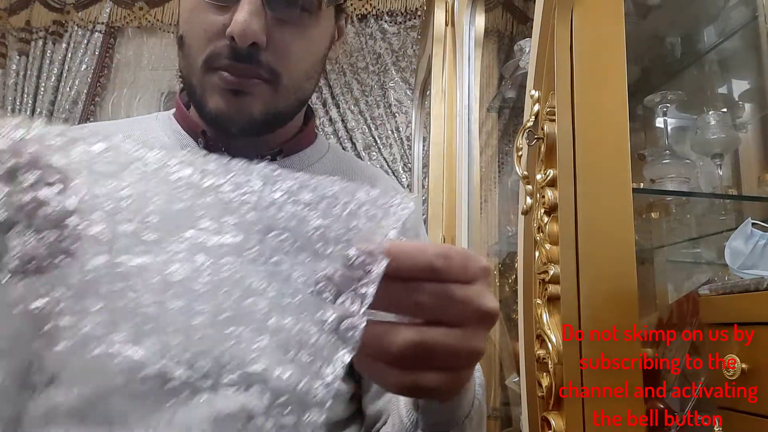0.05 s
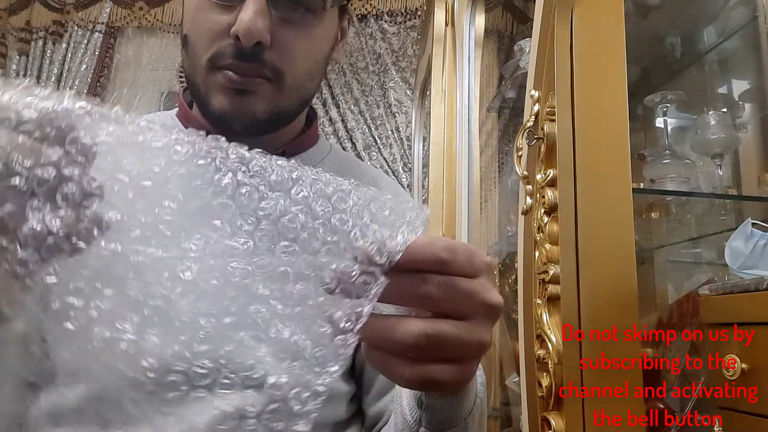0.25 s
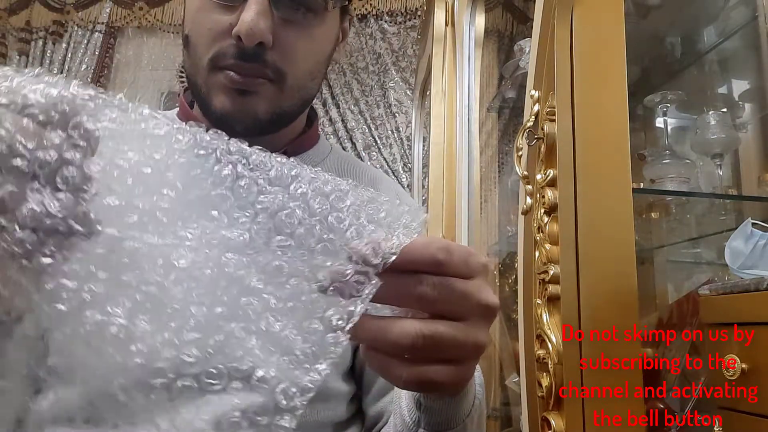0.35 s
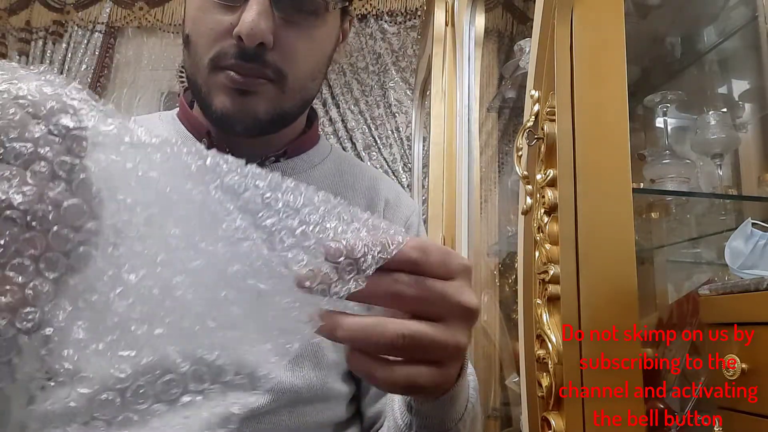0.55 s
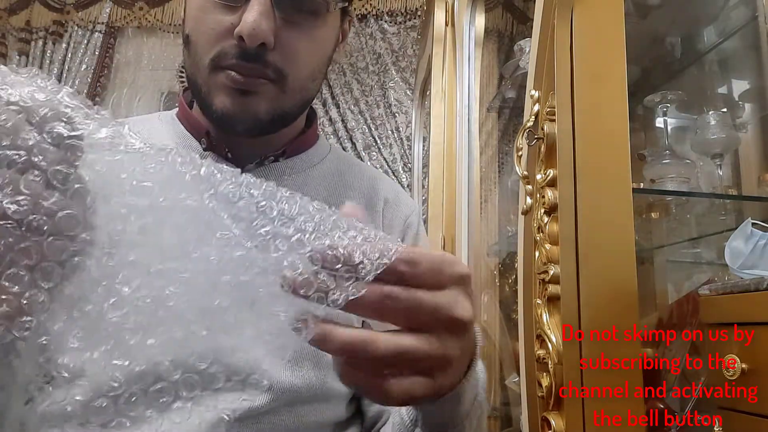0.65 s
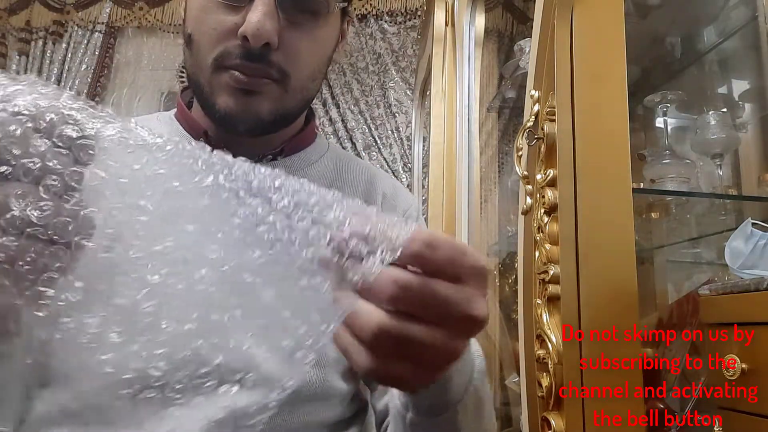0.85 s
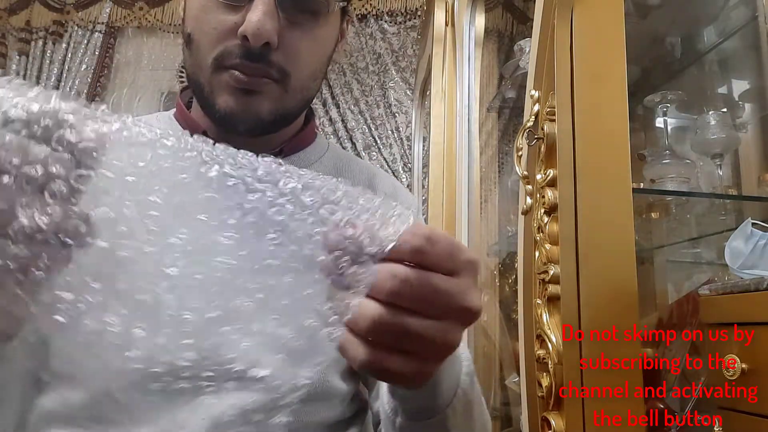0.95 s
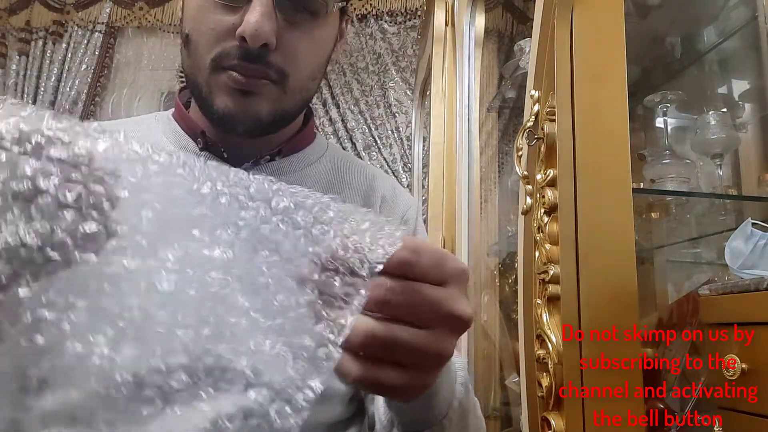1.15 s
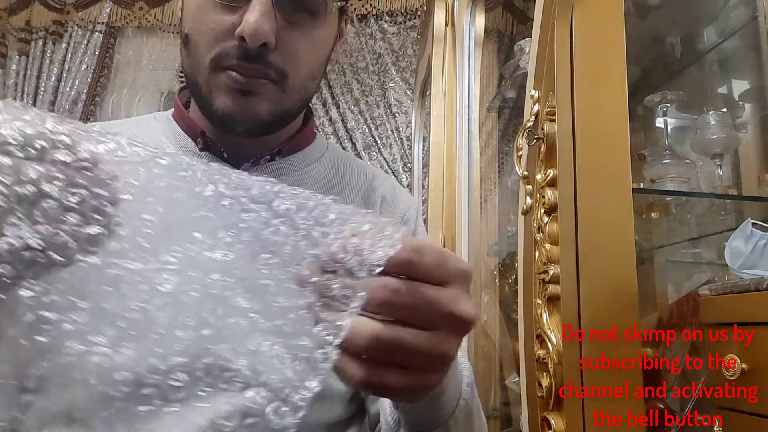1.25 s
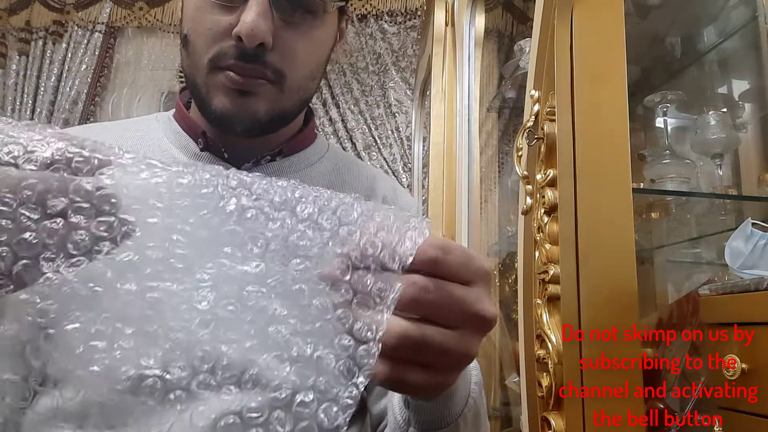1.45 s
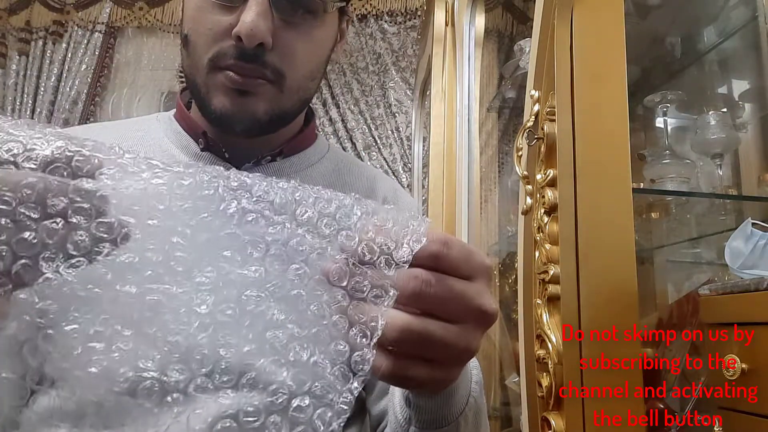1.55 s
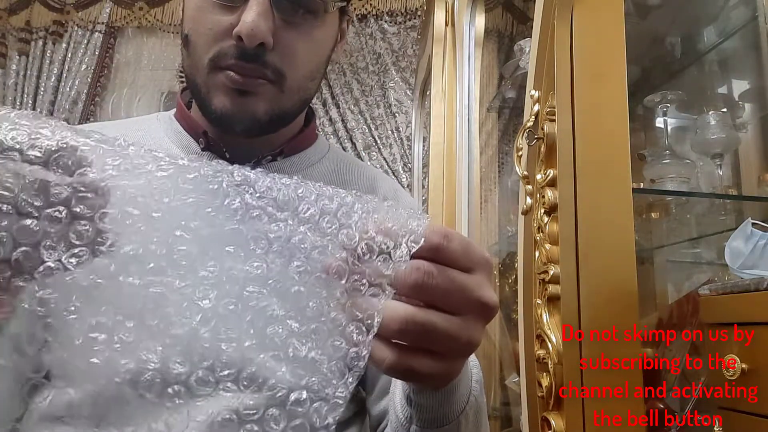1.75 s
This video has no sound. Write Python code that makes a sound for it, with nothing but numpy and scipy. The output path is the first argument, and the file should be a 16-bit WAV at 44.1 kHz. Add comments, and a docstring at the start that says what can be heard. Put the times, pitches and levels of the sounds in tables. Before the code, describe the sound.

One sharp bubble wrap pop, with a low rub of hands and faint plastic crinkles.

```python
"""In a small quiet room, hands shift a sheet of bubble wrap and burst it once.
The film crackles faintly as its creases buckle. The flexing sheet rumbles in a few low resonances
and hums briefly while it is squeezed. The pop is a quick cluster of bright cracks from the tearing
film with a puff of escaping air, followed by early echoes and a short reverberant tail."""
import sys
import numpy as np
from scipy import signal
from scipy.fft import rfft, irfft
from scipy.io import wavfile
from scipy.ndimage import uniform_filter1d

SR = 44100
rng = np.random.default_rng(int(sys.argv[2]) if len(sys.argv) > 2 else 0)


def unload_audio(sound):
    """Save the sound as a 16-bit wav file, at the path given as the first command line argument."""
    columns = np.transpose(np.atleast_2d(sound))
    # keep every value between -1 and 1, then stretch to whole-number steps
    steps = np.round(np.clip(columns, -1, 1) * 32767)
    wavfile.write(sys.argv[1], SR, steps.astype(np.int16))


N = 79380
T = np.arange(N) / SR

# reverberation time of the room (frequency [Hz], T60 [s])
ROOM_T60 = [(300, .25), (800, .13), (2000, .13), (3500, .1), (8000, .08), (15000, .064)]
# spectrum of the crinkles and of the pop's late tail (frequency [Hz], level [dB])
CRINKLE_SPECTRUM = [(500, -14), (1200, -3.5), (1900, 2), (2600, -1), (3600, -6), (8000, -9.5),
                    (12000, -17.5), (16000, -25.5)]


def amp(db):
    """Amplitude ratio of a level in decibels."""
    return 10 ** (np.asarray(db) / 20)


def at_frequency(points, hz):
    """Interpolation on a logarithmic frequency axis."""
    frequencies, values = np.transpose(points)
    return np.interp(np.log(hz + 1), np.log(frequencies + 1), values)


def add(mix, start_s, sound):
    """Superposition: a sound joins the mix at its onset."""
    part = mix[round(start_s * SR):][:len(sound)]
    part += sound[:len(part)]


def coloured(x, spectrum, size=4096):
    """Minimum-phase filtering: a causal response of unit energy imposes the spectrum."""
    log_gain = np.log(amp(at_frequency(spectrum, abs(np.fft.fftfreq(size, 1 / SR)))))
    taps = np.fft.ifft(np.exp(np.conj(signal.hilbert(log_gain)))).real[:size // 2]
    return signal.fftconvolve(x, taps / np.linalg.norm(taps))[:len(x)]


def snap(decay_s, size=512):
    """Broadband transient: a decaying burst of tiny tears, evened to a flat spectrum."""
    burst = rng.standard_normal(size) * np.exp(-T[:size] / decay_s)
    spectrum = rfft(burst, 2 * size)
    return irfft(spectrum / (abs(spectrum) + 1e-12))[:size] * np.sqrt(decay_s * SR / 2)


def reverberation(x, t60s, delay_s=.006):
    """Diffuse field: dense reflections build up, then decay exponentially in each band."""
    hz, t, bands = signal.stft(rng.standard_normal(SR // 2), SR, nperseg=128)
    tail = signal.istft(bands * amp(-60 * t / at_frequency(t60s, hz)[:, None]), SR)[1]
    tail *= np.clip(T[:len(tail)] / delay_s - .5, 0, 1)
    return signal.fftconvolve(x, tail / np.linalg.norm(tail))[:N]


def room_hush():
    """Ambient noise: a steady random floor, strongest at low frequencies."""
    # spectrum of the quiet room (frequency [Hz], level [dB])
    spectrum = [(100, 0), (720, 2.5), (1100, -8.5), (2400, -10.5), (7300, -14), (16000, -22.5)]
    return amp(-93.5) * coloured(rng.standard_normal(N), spectrum)


def crinkles(ticks_per_s=1600, snap_s=.00026, decay_cycles=2.7):
    """Buckling: creases snap and ring at their own pitch; each touch swells a flurry of tiny ticks."""
    # touches on the film (centre time [s], duration [s], level [dB])
    touches = [(0.612, 0.057, -99), (.86, 0.029, -93.5), (0.973, 0.1, -97.5), (1.177, 0.061, -98),
               (1.388, 0.061, -101)]
    # buckling creases (time [s], level [dB], frequency [Hz])
    creases = [(.158, -78, 1867), (.630, -80, 2030), (0.852, -77.5, 2390), (0.943, -78.5, 2400),
               (.968, -84, 2210), (1.029, -80.5, 8850), (1.097, -76.5, 2100), (1.139, -79, 1950),
               (1.176, -73, 2100), (1.190, -75.5, 10800), (1.396, -82.5, 1750), (1.575, -88, 7320),
               (1.733, -87, 7000)]
    swells = sum(amp(db) * np.exp(-(2 * (T - s) / length) ** 2) for s, length, db in touches)
    ticks = (rng.random(N) < ticks_per_s / SR) * rng.standard_normal(N)
    clicks = (amp(-106) + swells) * ticks / np.sqrt(np.mean(ticks ** 2) + 1e-30)
    rings, t = np.zeros(N), T[:SR // 20]
    for start, db, hz in creases:
        add(clicks, start, amp(db) * snap(snap_s))
        ring_s = decay_cycles / hz
        ring = np.exp(-t / ring_s) * np.sin(2 * np.pi * hz * t)
        add(rings, start, amp(db - .5) * np.sqrt(2 * snap_s / ring_s) * ring)
    direct = coloured(clicks, CRINKLE_SPECTRUM) + rings
    return direct + amp(-9) * reverberation(direct, ROOM_T60)


def noise_band(levels, spectrum, modes=(), window=2200):
    """Random excitation: noise shaped by a band and its resonances, steadied, then given an envelope."""
    hz = np.fft.rfftfreq(N, 1 / SR)
    peaks_db = sum(db / (1 + (2 * (hz - centre) / width) ** 2) for centre, width, db in modes)
    gain = amp(at_frequency(spectrum, hz) + peaks_db)
    skirt = 1 / (1 + (hz / spectrum[-1][0]) ** 8)
    noise = irfft(rfft(rng.standard_normal(N)) * gain * skirt, N)
    power = uniform_filter1d(uniform_filter1d(noise ** 2, window), window // 2)
    level_db = uniform_filter1d(np.interp(T, *np.transpose(levels)), window // 8)
    return noise / np.sqrt(power) * amp(level_db)


def sheet_rumble():
    """Forced vibration: soft random pushes drive the flexing sheet and its low resonances."""
    # envelopes of three bands (time [s], level [dB])
    bass = [(0.0, -45.5), (0.14, -66), (0.26, -40), (0.294, -52.5), (0.354, -40.5), (.43, -36),
            (0.496, -44.5), (0.52, -51), (0.56, -43), (0.59, -47), (0.646, -76), (0.686, -60), (0.736, -73),
            (.78, -61.5), (.89, -61), (.93, -51), (0.98, -48), (1.022, -70.5), (1.128, -47), (1.158, -62),
            (1.252, -57.5), (1.288, -69.5), (1.368, -61.5), (1.412, -69), (1.554, -45), (1.598, -48.5),
            (1.618, -59), (1.68, -61.5), (1.712, -46), (1.8, -64.5)]
    low_mid = [(0.0, -42.5), (0.114, -58), (0.194, -44), (0.314, -46.5), (0.36, -48), (0.5, -43.5),
               (0.6, -50.5), (0.63, -68), (0.756, -74.5), (0.792, -63.5), (0.986, -61), (1.012, -68.5),
               (1.252, -65.5), (1.288, -73.5), (1.332, -63.5), (1.422, -71), (1.508, -49), (1.8, -60.5)]
    mid = [(0.0, -57), (0.144, -47.5), (0.184, -51.5), (0.264, -39), (0.35, -33.5), (0.38, -39.5),
           (0.566, -47.5), (0.64, -64.5), (0.7, -64), (0.748, -83), (.8, -63.5), (0.846, -53.5),
           (0.905, -68.5), (0.952, -56), (1.036, -64.5), (1.066, -56.5), (1.16, -67), (1.21, -53),
           (1.268, -67.5), (1.458, -64), (1.488, -56.5), (1.584, -62.5), (1.8, -57)]
    # spectra of those bands (frequency [Hz], level [dB])
    bass_spectrum = [(20, -37), (38, -22.5), (58, -9), (80, -4.5), (98, -1), (110, -1), (125, 7), (145, -9),
                     (190, -40)]
    low_mid_spectrum = [(115, -40.5), (150, -7), (167, -1), (190, -1), (215, -5.5), (250, -9.5), (300, -43)]
    mid_spectrum = [(215, -42), (270, -8), (400, -7), (418, -16), (440, -29.5), (475, -54)]
    # resonances of the held sheet (frequency [Hz], bandwidth [Hz], gain [dB])
    modes = [(281.7, 26, 8.5), (317, 7.4, 4), (343.6, 27, 7), (387.9, 20, 8)]
    # the rumble gives way to the hum during the squeeze (time [s], gain [dB])
    squeeze = [(.24, 0), (.31, -5.5), (.56, -3.5), (.62, -1), (.7, 1)]
    rumble = noise_band(bass, bass_spectrum) + noise_band(low_mid, low_mid_spectrum)
    rumble += noise_band(mid, mid_spectrum, modes)
    return rumble * amp(np.interp(T, *np.transpose(squeeze)))


def finger_rub():
    """Friction noise: the fingers rub the sheet, a dull band above the rumble."""
    # envelope of the rub (time [s], level [dB])
    levels = [(0, -67.5), (.06, -87), (.15, -72), (.19, -73.5), (.26, -56), (.29, -65.5), (.344, -54),
              (.386, -60), (.53, -61), (.6, -78), (.68, -100), (.79, -99.5), (.87, -79), (.94, -91),
              (1.05, -71.5), (1.15, -91), (1.19, -68.5), (1.265, -94.5), (1.305, -75), (1.36, -98.5),
              (1.72, -101), (1.78, -78)]
    # spectrum of the rub (frequency [Hz], level [dB])
    spectrum = [(390, -29), (445, 3.5), (490, -1.5), (535, -1), (590, -8.5), (630, -24.5), (720, -30),
                (900, -49.5)]
    return noise_band(levels, spectrum)


def sheet_hum(rise_s=.044, fall_s=.053, waver_depth=.01, waver_points=60):
    """Amplitude and frequency modulation: low tones of the squeezed sheet swell, waver and fade."""
    # tones that stand out of the rumble (start [s], end [s], frequency [Hz], level [dB])
    tones = [(.14, 0.16, 186, -44.5), (0.38, .605, 62.5, -56), (0.232, .595, 125, -46.5),
             (.335, 0.542, 188.5, -41), (.52, .6, 187, -46.5), (0.313, 0.38, 284, -41),
             (0.38, 0.543, 284, -51), (0.314, 0.368, 355, -41), (0.368, 0.572, 300, -52),
             (0.251, 0.308, 393, -39), (0.317, .55, 383, -52.5), (0.2235, 0.365, 437, -52.5),
             (.235, 0.369, 530, -58.5), (0.68, 0.7106, 395, -62), (1.178, 1.228, 397, -52.5)]
    hum = np.zeros(N)
    for start, end, hz, db in tones:
        gate = np.clip((T - start) / rise_s + .5, 0, 1) * np.clip((end - T) / fall_s + .5, 0, 1)
        waver = np.interp(T, np.linspace(0, T[-1], waver_points), rng.standard_normal(waver_points))
        cycles = np.cumsum(hz * (1 + waver_depth * waver)) / SR + rng.random()
        hum += amp(db) * np.sqrt(2) * np.sin(np.pi / 2 * gate) ** 2 * np.sin(2 * np.pi * cycles)
    return hum


def air_puff(start_s=.4335, rise_s=.0028):
    """Pressure release: air escapes from the opening bubble with a knock of damped sinusoids."""
    # partials of the knock (frequency [Hz], level [dB], T60 [s])
    partials = [(469.5, -33, .022), (640, -29.5, 0.021), (777.3, -30, 0.017), (1300, -46.5, 0.018),
                (2530, -28, 0.0088), (2764, -38.5, .01)]
    puff, t = np.zeros(N), T[:SR // 10]
    attack = 1 - np.exp(-(t / rise_s) ** 2)
    for k, (hz, db, t60) in enumerate(partials):
        add(puff, start_s, (-1) ** k * amp(db - 60 * t / t60) * attack * np.sin(2 * np.pi * hz * t))
    return puff


def film_cracks():
    """Fracture: the bursting film tears in a quick series of high-passed impulses."""
    # tears (time [s], level [dB], decay time constant [s], low cutoff [Hz])
    tears = [(0.434, -30, .001, 1010), (0.4363, -11.5, .0005, 298.7), (.4373, -13, .0003, 988),
             (0.4373, -25.5, 0.0014, 4010), (0.446, -18.5, .0006, 5998), (0.446, -20, .0003, 5994),
             (.4480, -8.5, .0004, 6426), (0.4483, -9.5, .0004, 6503)]
    cracks = np.zeros(N)
    for start, db, decay_s, cutoff_hz in tears:
        high_pass = signal.butter(2, cutoff_hz, "high", fs=SR, output="sos")
        add(cracks, start, amp(db) * signal.sosfilt(high_pass, snap(decay_s)))
    return cracks


def film_ringing(burst):
    """Free vibration: the burst sets the torn bubble ringing in damped modes."""
    # modes of the torn bubble (frequency [Hz], level [dB], T60 [s])
    modes = [(5700, -34.5, .007), (8240, -28.5, 0.015), (11650, -28, 0.018)]
    t = T[:SR // 10]
    response = sum(amp(db - 60 * t / t60) * np.cos(2 * np.pi * hz * t) for hz, db, t60 in modes)
    response[0] += 1  # the burst itself passes through
    return signal.fftconvolve(burst, response / np.linalg.norm(response))[:N]


def pop():
    """Direct and reflected sound: the bubble bursts, and nearby surfaces and the room answer."""
    # spectrum of a crack (frequency [Hz], level [dB])
    crack_spectrum = [(300, -24.5), (780, -26), (980, -37.5), (2100, -39), (2420, -18), (3080, -27),
                      (3380, 3), (5600, 2.5), (9500, 1), (12300, 3.5), (13300, -10), (14000, -7.5),
                      (15600, -14), (16100, -37.5)]
    # early reflections off nearby glass and wood (delay [s], gain [dB])
    echoes = [(.0087, -20.5), (.0098, -19.5), (0.0134, -24.5), (.0175, -24.5), (.021, -22.5), (0.0248, -24)]
    cracks, puff = film_cracks(), air_puff()
    burst = coloured(cracks, crack_spectrum)
    early = puff + film_ringing(burst)
    for delay_s, db in echoes:
        add(early, delay_s, amp(db) * burst)
    late_tail = reverberation(coloured(cracks, CRINKLE_SPECTRUM), t60s=[(1000, .38)])  # all bands alike
    tail = reverberation(burst + amp(-2.5) * puff, ROOM_T60)
    return early + amp(-11) * tail + amp(-44) * late_tail


def scene():
    """Superposition: the pressures of all sources add in one channel."""
    return (room_hush() + sheet_rumble() + finger_rub() + sheet_hum() + pop() + crinkles())[None]


def record(dry):
    """Band limiting: a linear-phase low-pass removes the highest treble."""
    cutoff_hz = 16200
    low_pass = signal.firwin(511, cutoff_hz, window=("kaiser", 9), fs=SR)
    return signal.oaconvolve(dry, low_pass[None], "same")


dry = scene()
out = record(dry)
unload_audio(out)
```